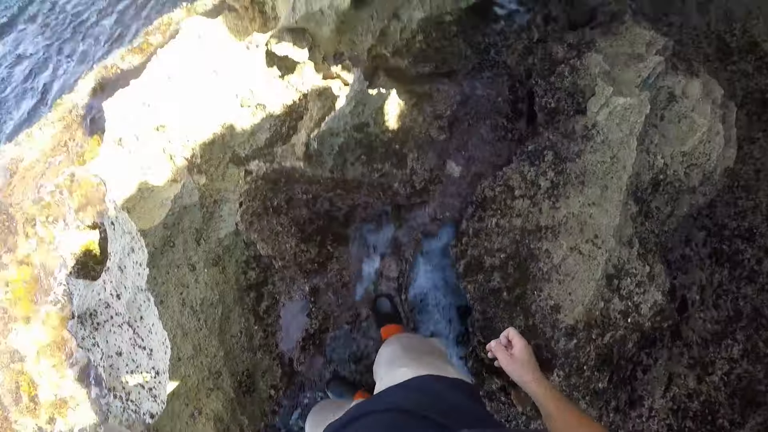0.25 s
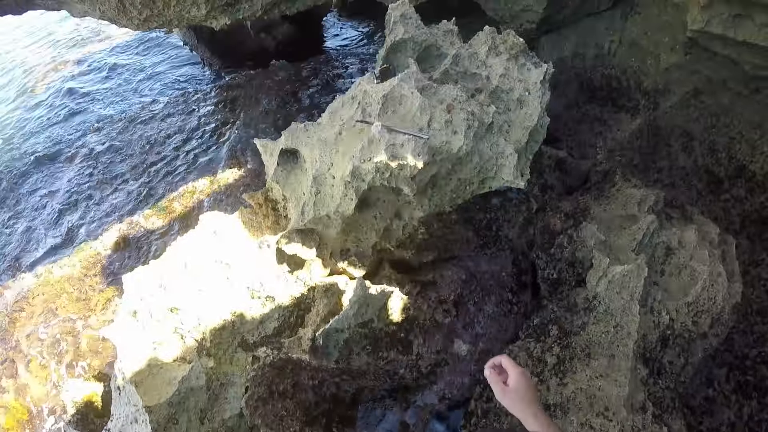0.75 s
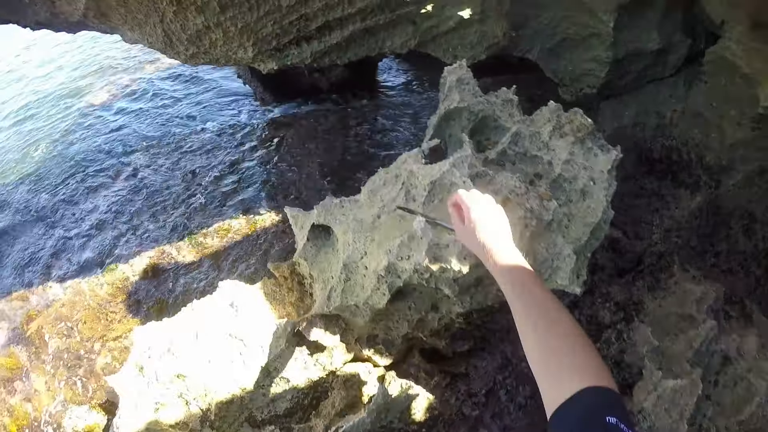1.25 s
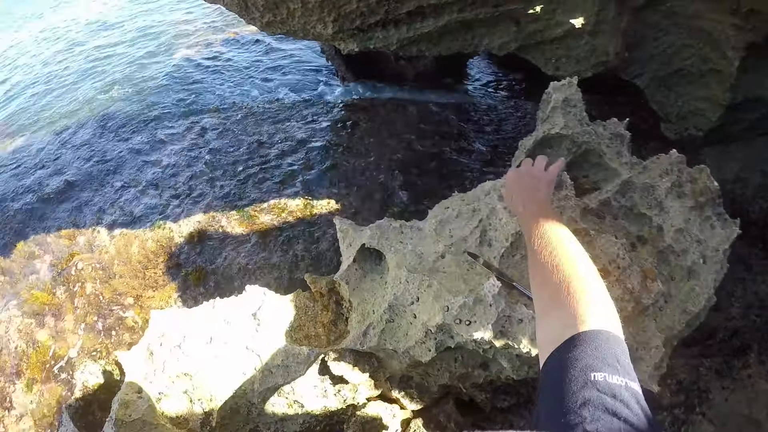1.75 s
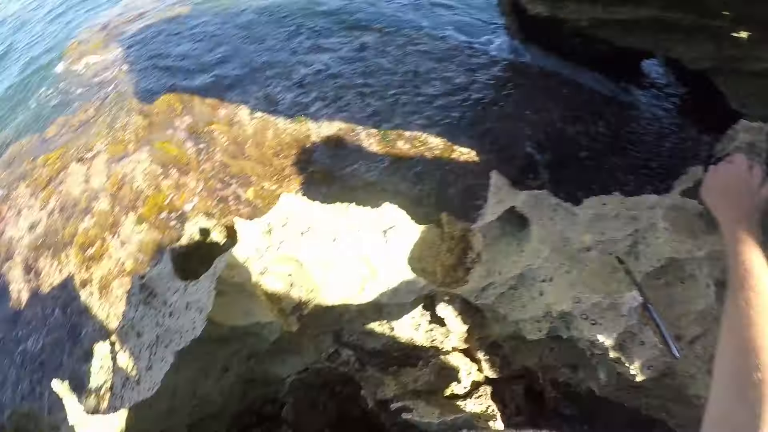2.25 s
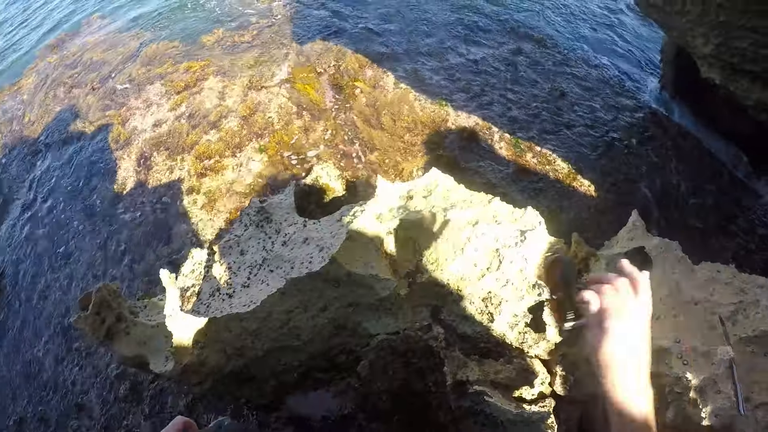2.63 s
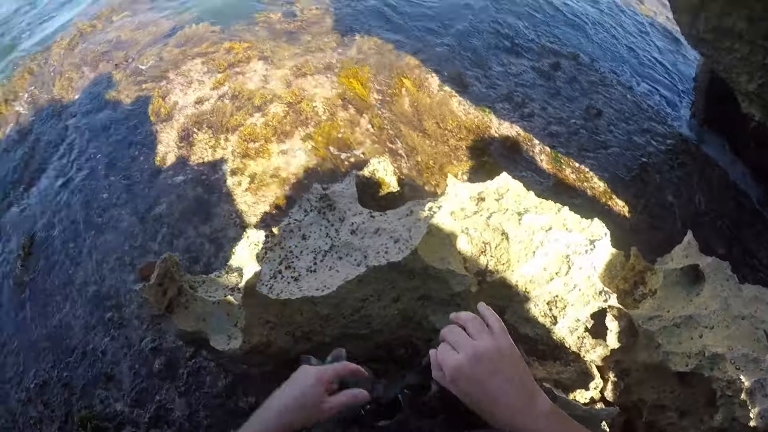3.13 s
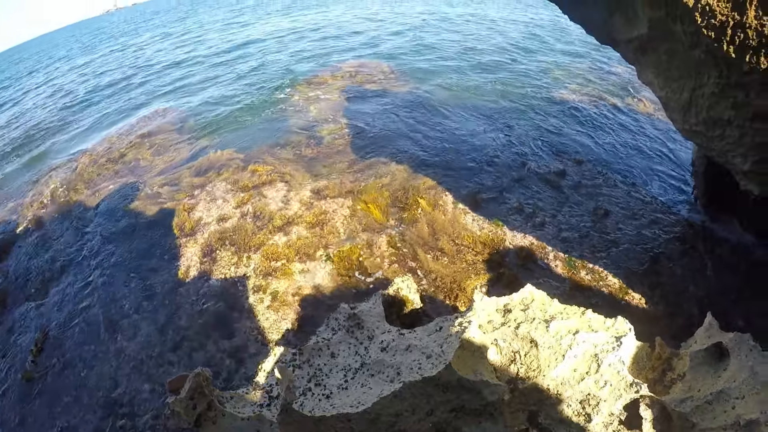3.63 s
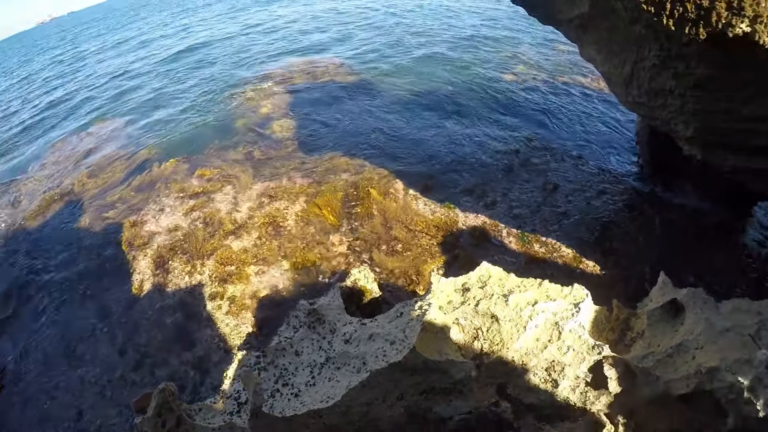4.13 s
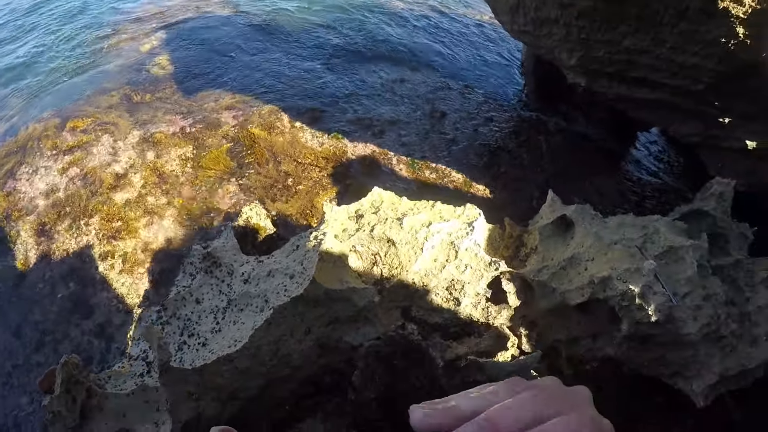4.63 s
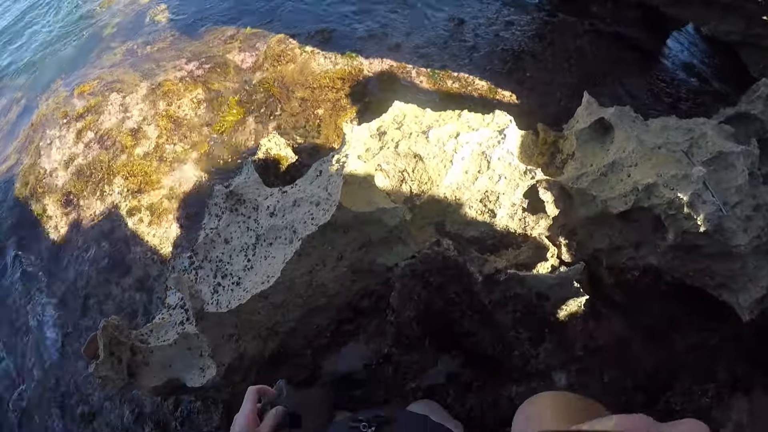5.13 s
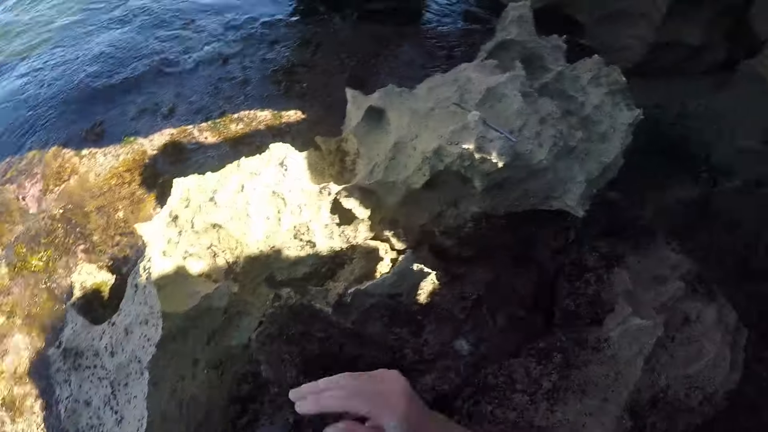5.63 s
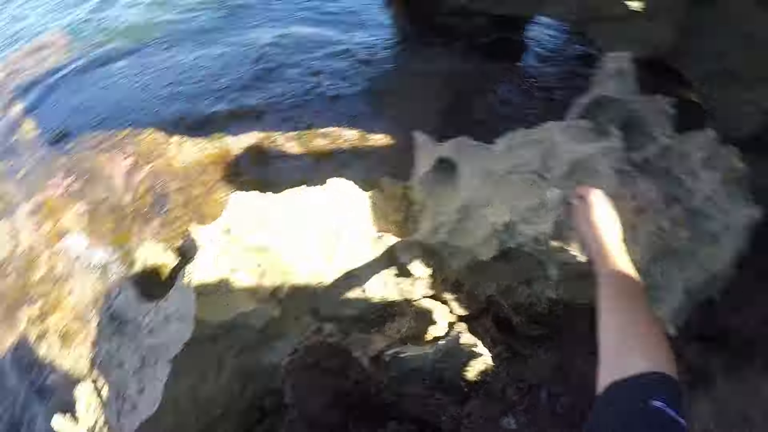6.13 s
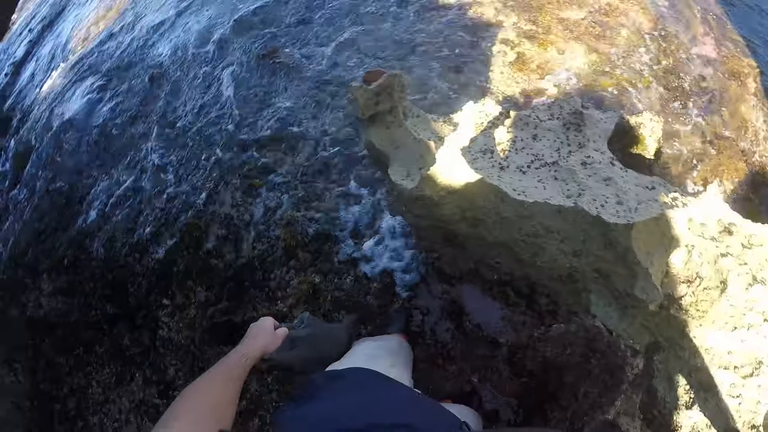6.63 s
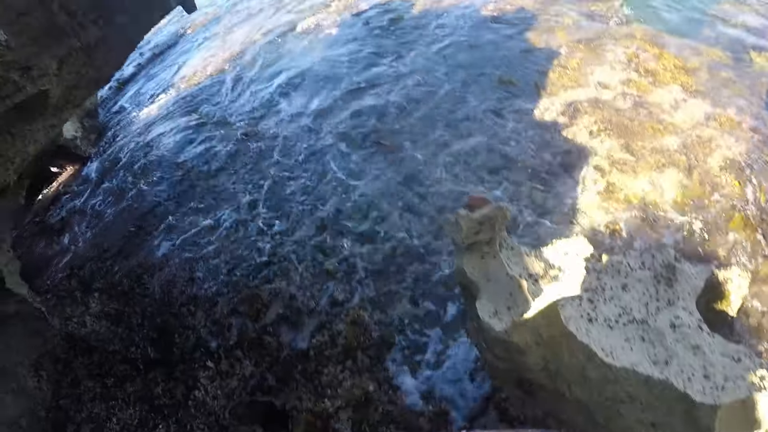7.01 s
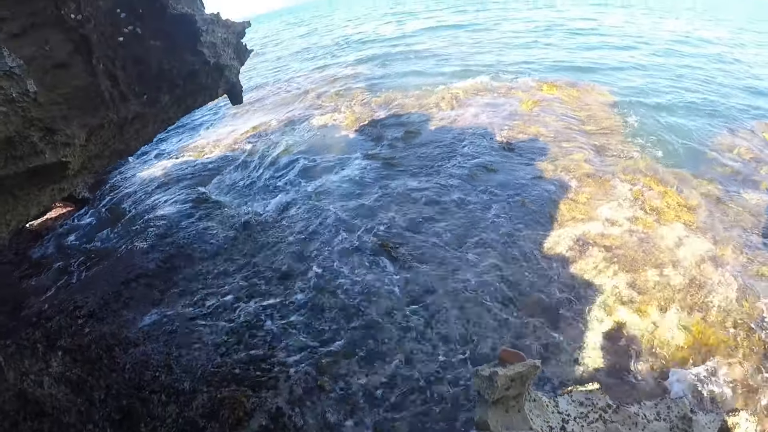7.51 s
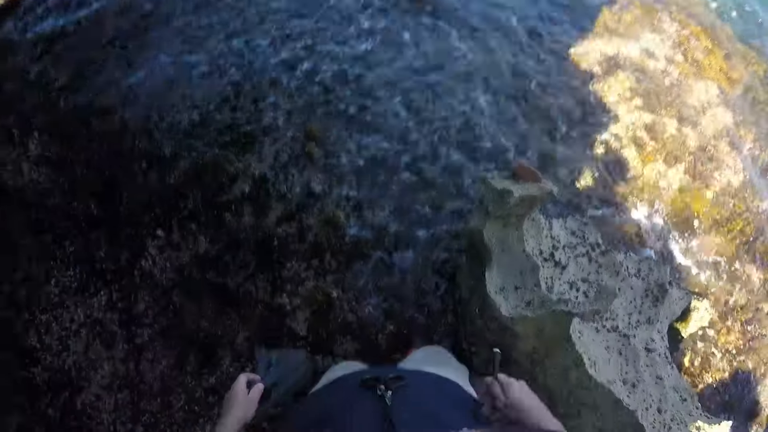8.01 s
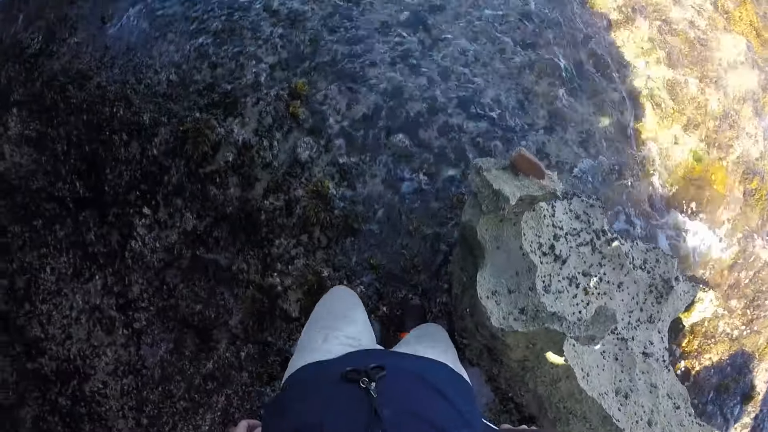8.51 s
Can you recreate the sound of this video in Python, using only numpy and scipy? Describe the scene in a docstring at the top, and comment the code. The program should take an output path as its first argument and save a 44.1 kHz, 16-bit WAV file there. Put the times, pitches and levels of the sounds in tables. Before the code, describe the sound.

Sea water washes, gurgles and fizzes over a rocky shelf, with low thumps and rumble from a body-worn camera and one short splash.

```python
"""Sea wash on a rocky reef

Water drains and returns over a rock shelf: bubbles gurgle in the hollows, foam fizzes and wavelets
break, with dull surf further out. Someone clambers on the rocks and lands one step in a puddle.
We listen from the camera they wear: its mount rumbles and thumps, its plastic case ticks, its strap
rubs, and the case wall colours the wash, the foam and the splash."""
import sys
import numpy as np
from scipy import signal
from scipy.fft import rfft, irfft, next_fast_len
from scipy.io import wavfile
from scipy.ndimage import uniform_filter1d, map_coordinates

SR = 44100
rng = np.random.default_rng(int(sys.argv[2]) if len(sys.argv) > 2 else 0)


def store_pcm(level_fs):
    """Save levels as 16-bit WAV."""
    pcm = np.round(np.clip(level_fs, -1, 1) * 32767).astype(np.int16)
    wavfile.write(sys.argv[1], SR, np.atleast_2d(pcm).T)


N = 386757
BAND_LIMIT_HZ = 15250


def amp(db):
    """Decibels to gain."""
    return 10 ** (np.asarray(db) / 20)


def unit(x):
    """Scale to rms 1."""
    return x / np.sqrt(np.mean(x ** 2) + 1e-20)


def automation(rows):
    """Straight lines through (seconds, value) points, one value per sample."""
    return np.interp(np.arange(N) / SR, *np.transpose(rows))


def wobble(rate):
    """A smooth random curve, rate knots a second."""
    return map_coordinates(rng.standard_normal(int(N * rate / SR) + 4), [np.arange(N) * rate / SR])


def filtered(x, response):
    """Filter x by a response given as a function of frequency."""
    size = next_fast_len(N + SR // 2)
    return irfft(rfft(x, size) * response(np.fft.rfftfreq(size, 1 / SR)), size)[:N]


def coloured(x, eq):
    """Shape x by (Hz, dB) points on a log axis, at rms 1."""
    points_hz, db = np.transpose(eq)
    return unit(filtered(x, lambda hz: amp(np.interp(np.log(hz + 1), np.log(points_hz), db))))


def resonance(hz, centre_hz, width_hz):
    """Causal response of one mode."""
    return 1j * hz * width_hz / (centre_hz ** 2 - hz ** 2 + 1j * hz * width_hz)


def add(track, start, sound):
    """Mix a sound in at start seconds."""
    part = track[round(start * SR):][:len(sound)]
    part += sound[:len(part)]


def patchy_noise(depth_db):
    """White noise with patches of random gain in time and pitch."""
    spectrum = signal.stft(rng.standard_normal(N), nperseg=512)[2]
    patches = uniform_filter1d(rng.standard_normal(spectrum.shape), size=6, axis=0)
    patches = uniform_filter1d(patches, size=10, axis=1)
    return unit(signal.istft(spectrum * amp(depth_db * unit(patches)), nperseg=512)[1][:N])


# Tone of the hiss. Each row: frequency in Hz, relative level in dB.
HISS_EQ = [(500, -4.5), (5000, 1), (9000, -3), (12500, -7), (15000, -23)]

def electronics():
    """A faint, slightly flickering hiss and a thin steady whine."""
    whine = np.sqrt(2) * amp(-82) * np.sin(2 * np.pi * 10406 * np.arange(N) / SR)
    hiss = amp(-68.5 + 0.6 * wobble(26)) * coloured(rng.standard_normal(N), HISS_EQ)
    return hiss + whine


# Tone of the distant surf. Each row: frequency in Hz, relative level in dB.
SURF_EQ = [(60, -6), (150, 0), (240, 1.5), (400, -1), (700, -2), (1100, -2.5), (2500, -22.5)]

def open_sea():
    """The dull rush of the swell further out heaves and slowly grows fainter."""
    crest_s, period_s, fade_db_per_s = 2.25, 3.23, 0.21
    t = np.arange(N) / SR
    heave_db = 1.26 * np.cos(2 * np.pi * (t - crest_s) / period_s)
    level_db = -59 + heave_db - fade_db_per_s * (t - t.mean())
    return coloured(patchy_noise(depth_db=1.75), SURF_EQ) * amp(level_db)


# The mount's sub-bass sway and bass shudder. Each row: frequency in Hz, relative level in dB.
SWAY_EQ = [(8, -7), (17, 4), (25, 2), (36, -5), (50, -12.5), (70, -24), (120, -41), (250, -87)]
SHUDDER_EQ = [(35, -9), (65, 2.5), (85, 0.5), (115, -1), (145, -8.5), (220, -17), (500, -63)]
# How hard the wearer clambers. Each row: time in seconds, effort in dB.
CLAMBER_EFFORT = [(0, -43.5), (.45, -36), (.8, -44.5), (1.5, -38), (1.95, -45.5), (2.45, -35), (3.1, -44.5),
                  (4.4, -43), (5.3, -33.5), (6.4, -41.5), (6.8, -37), (7.5, -35.5), (7.72, -41),
                  (8.05, -33.5), (8.45, -44), (8.77, -41.5)]

def mount_rumble():
    """The mount sways and shudders unevenly, more as its wearer works harder."""
    effort_db = automation(CLAMBER_EFFORT)
    lurch = wobble(6)
    sway = coloured(rng.standard_normal(N), SWAY_EQ) * amp(effort_db + 3.5 + 0.7 * lurch)
    shudder_db = -58 + 0.4 * (effort_db - effort_db.mean()) + 2.1 * lurch
    return sway + coloured(rng.standard_normal(N), SHUDDER_EQ) * amp(shudder_db)


# Short slides of the strap on the case. Each row: start in seconds, length in seconds, level in dB.
STRAP_STROKES = [(4.88, .03, -57), (4.98, .03, -53), (5.03, .08, -54), (5.128, 0.041, -53),
                 (5.207, 0.066, -56.5), (5.408, 0.033, -54), (5.447, .04, -57.5)]

def strap_grip(release_s, attack_s=0.01):
    """Envelope of the strap's grip: each stroke builds, holds and lets go."""
    out, t = np.zeros(N), np.arange(SR // 2) / SR
    for start, length, db in STRAP_STROKES:
        attack = np.minimum(t / attack_s, 1)
        release = np.exp(-np.maximum(t - length, 0) / release_s)
        add(out, start, amp(db) * attack * release)
    return out


def strap_rub():
    """Uneven friction drives a hollow mode of the case and its low body, and shakes the mount."""
    slips = rng.standard_normal(N) * amp(1.3 * wobble(90))
    hollow = unit(filtered(slips, lambda hz: resonance(hz, centre_hz=970, width_hz=310) ** 2))
    body = unit(filtered(slips, lambda hz: resonance(hz, centre_hz=135, width_hz=140) ** 2))
    shudder = coloured(rng.standard_normal(N), SHUDDER_EQ) * amp(9)
    scrape = strap_grip(release_s=0.019) * (hollow + amp(-5.5) * body)
    return scrape + strap_grip(release_s=0.031) * shudder


# Jolts of the mount. Each row: start in seconds, envelope peak in dB, pitch in Hz.
MOUNT_JOLTS = [(0.386, -28.5, 41.8), (0.429, -35, 75), (.636, -32.5, 61.6), (.671, -18.5, 37.7),
               (.921, -15.5, 30.2), (0.984, -19.5, 29.6), (1.72, -40, 70), (2.262, -24, 20.2),
               (2.62, -27, 88), (4.72, -40, 80), (4.79, -23.5, 30.3), (4.891, -22.5, 85),
               (4.899, -15.5, 42.4), (5.205, -22, 20.9), (5.488, -29, 44.3), (6.11, -43, 72),
               (6.27, -38, 80), (6.597, -25.5, 33), (6.658, -25, 31.8), (6.765, -32.5, 60),
               (7.287, -25, 60), (7.317, -19.5, 22), (7.945, -29, 57.6), (8.02, -21.5, 20.3)]

def mount_thumps():
    """Each soft jolt swings the mount through a few heavily damped cycles."""
    contact_s, rise_cycles, ring_cycles = 0.0033, 0.4, 6
    out, t = np.zeros(N), np.arange(SR // 2) / SR
    for start, db, hz in MOUNT_JOLTS:
        cycles = hz * t
        attack = 1 - np.exp(-(t / (contact_s + rise_cycles / hz)) ** 2)
        swing = attack * amp(-60 * cycles / ring_cycles)
        add(out, start, amp(db) * swing / swing.max() * np.sin(2 * np.pi * cycles))
    return out


# Light knocks on the case. Each row: start in seconds, level in dB, pitch in Hz.
CASE_KNOCKS = [(.434, -31, 1084), (0.436, -36, 1780), (1.022, -32, 1070), (1.022, -38, 230),
               (2.275, -31, 200), (2.29, -45, 403), (5.455, -36, 250), (6.133, -37, 950), (6.164, -43, 256),
               (7.285, -39, 1090), (7.308, -39, 1410), (7.608, -40, 1000), (7.984, -33.5, 222)]

def case_knocks():
    """Short contacts ring the case in a broad, rough band over a dull crack."""
    out, t = np.zeros(N), np.arange(SR // 5) / SR
    for start, db, hz in CASE_KNOCKS:
        t60 = 0.028 * (1000 / hz) ** 0.49  # higher knocks die sooner
        phase_drift = 0.086 * np.sqrt(hz / SR) * np.cumsum(rng.standard_normal(len(t)))
        ring = np.sin(2 * np.pi * (hz * t + phase_drift))
        crack = unit(signal.lfilter(*signal.butter(2, 1.4 * hz, fs=SR), rng.standard_normal(len(t))))
        envelope = amp(-60 * t / t60) * (1 - np.exp(-t * hz))
        add(out, start, amp(db) * envelope * (0.66 * ring + 0.46 * crack))
    return out


def bell(x, centre, width):
    """A smooth rise to 1 and fall around centre."""
    return np.exp(-2 * ((x - centre) / width) ** 2)


# Peaks and dips of the case wall. Each row: centre in Hz, width in Hz, gain in dB.
CASE_EQ = [(1318, 30, -8), (1433, 114, 3.5), (1747, 134, 4), (2534, 260, 3), (2854, 150, -2.5),
           (3144, 330, -2.5), (3810, 220, 2.5), (4535, 190, -6.5), (4700, 200, 2), (5070, 330, -2.5),
           (6150, 240, 3), (10530, 530, 8)]

def through_case(x):
    """Outside sound as coloured by the plastic wall, at rms 1."""
    return unit(filtered(x, lambda hz: amp(sum(db * bell(hz, mid, width) for mid, width, db in CASE_EQ))))


# Tone of the spray. Each row: frequency in Hz, relative level in dB.
SPRAY_EQ = [(700, -12), (1700, -1), (2400, 10), (3200, -9), (4400, 11), (5500, -6), (7000, -3), (9000, -19),
            (15000, -24)]
# Bursts of one splash. Each row: start in seconds, level in dB, seconds to fall by 60 dB.
SPLASH_BURSTS = [(.669, -39.5, .08), (.672, -32, .014), (.681, -41.5, .085)]

def puddle_step():
    """A foot hits a puddle: a sharp wet slap with a short tail of spray."""
    envelope, t = np.zeros(N), np.arange(SR // 4) / SR
    for start, db, t60 in SPLASH_BURSTS:
        add(envelope, start, amp(db - 60 * t / t60))
    spray = coloured(rng.standard_normal(N) * amp(0.48 * wobble(700)), SPRAY_EQ)
    return envelope * through_case(spray)


def bubbles(count, centre_hz, spread, decay_cycles, rise, samples):
    """Damped sines at random times; each rises in pitch as its bubble nears the surface."""
    start = rng.integers(0, N, (count, 1))
    hz = np.clip(centre_hz * np.exp(spread * rng.standard_normal((count, 1))), 200, BAND_LIMIT_HZ)
    gain = amp(1.5 * np.minimum(rng.exponential(size=(count, 1)), 4))
    cycles = hz * np.arange(samples) / SR
    age = cycles / decay_cycles
    chirp = np.sin(2 * np.pi * cycles * (1 + rise * np.minimum(age, 2)))
    envelope = gain * np.exp(-age) * (1 - np.exp(-2 * cycles)) * np.linspace(1, 0, samples)
    positions = start + np.arange(samples)
    return unit(np.bincount(positions.ravel(), (chirp * envelope).ravel(), N + samples)[:N])


# Tone of the wash and of its brighter foam. Each row: frequency in Hz, relative level in dB.
WASH_EQ = [(300, -18), (600, -7), (950, -4), (1500, -2.5), (2000, 1), (2550, -0.5), (3100, -4.5),
           (4500, -4), (8000, -27)]
FOAM_EQ = [(1500, -7), (2800, -6.5), (3800, 1), (4700, 1), (5200, -9.5), (6300, -5), (7200, -8.5),
           (9000, -18), (11000, -20.5), (15000, -32)]
# Water on the shelf as the swell drains and returns. Each row: time in seconds, level in dB.
SHELF_FLOW = [(0, -51), (.45, -49), (1.3, -48), (2.0, -50), (2.5, -50), (2.85, -53), (3.9, -55.8),
              (5.2, -56.5), (5.45, -53), (6.2, -54.5), (7.0, -55), (7.75, -53), (8.2, -49.8), (8.77, -51)]
# Breaking wavelets. Each row: crest time in seconds, width in seconds, wash in dB, foam in dB.
BREAKING_WAVELETS = [(.2, 0.45, -66, -55), (0.435, 0.11, -53.5, -58), (1.3, 0.13, -54.5, -58),
                     (2.517, 0.069, -56, -70), (4.146, .03, -66, -61), (5.37, .14, -71, -62),
                     (5.8, .14, -64, -57), (6.45, .12, -56, -59), (6.78, 0.045, -56, -61),
                     (7.162, 0.2, -57, -59), (7.31, 0.084, -55, -59), (8.223, 0.29, -66, -51),
                     (8.55, 0.35, -62, -52.5)]

def reef_wash():
    """Water pours over the rock with gurgling bubbles; foam fizzes, wavelets break and drops tick."""
    t = np.arange(N) / SR
    flow_db, usual_flow_db = automation(SHELF_FLOW), -52
    wash_power = amp(flow_db) ** 2
    foam_power = amp(-57.5 + 1.06 * (flow_db - usual_flow_db)) ** 2
    for crest_s, width_s, wash_db, foam_db in BREAKING_WAVELETS:
        surge = bell(t, crest_s, width_s)
        wash_power += (amp(wash_db) * surge) ** 2
        foam_power += (amp(foam_db) * surge) ** 2
    lapping = wobble(13)
    gurgle = bubbles(count=14000, centre_hz=1595, spread=0.422, decay_cycles=11.5, rise=0.017, samples=350)
    fizz = bubbles(count=16000, centre_hz=4727, spread=0.446, decay_cycles=5.5, rise=0.03, samples=200)
    drops = bubbles(count=1300, centre_hz=6960, spread=0.15, decay_cycles=0.83, rise=0.01, samples=60)
    wash = coloured(patchy_noise(depth_db=1.1) + 0.33 * gurgle, WASH_EQ)
    wash = through_case(wash) * amp(0.55 * lapping)
    # drops fall in little showers as each ripple laps the rock
    showers = drops * amp(-18.5 + 1.8 * lapping + 1.6 * wobble(18))
    foam = coloured(patchy_noise(depth_db=1.2) + 0.5 * fizz, FOAM_EQ)
    foam = through_case(foam + showers) * amp(0.8 * lapping + 0.84 * wobble(35))
    return wash * np.sqrt(wash_power) + foam * np.sqrt(foam_power)


def scene():
    """A mono mix of water outside, handling on the case and faint hiss."""
    water = reef_wash() + open_sea() + puddle_step()
    handling = mount_rumble() + mount_thumps() + case_knocks() + strap_rub()
    return (water + handling + electronics())[None]


def record(dry):
    """The camera keeps nothing above its band limit."""
    return np.array([filtered(x, lambda hz: np.clip((BAND_LIMIT_HZ - hz) / 200, 0, 1)) for x in dry])


dry = scene()
out = record(dry)
store_pcm(out)
```